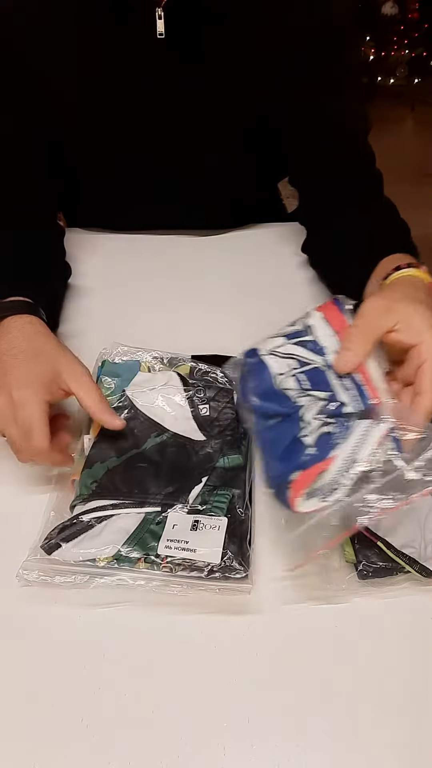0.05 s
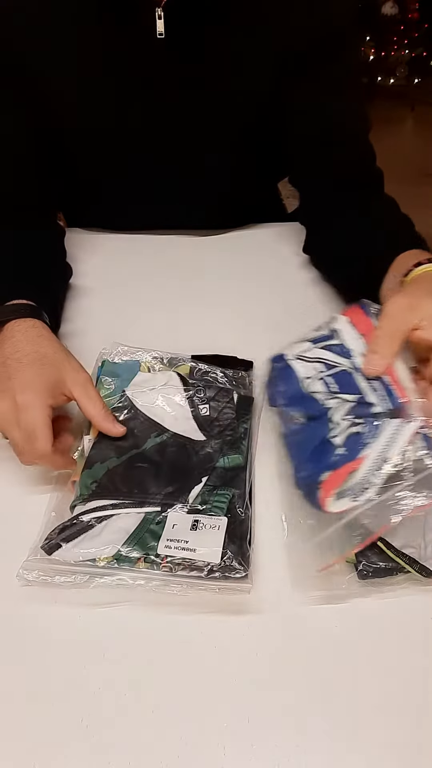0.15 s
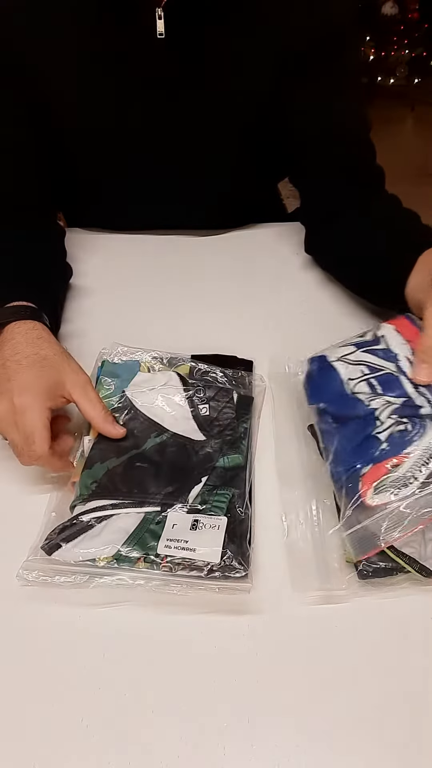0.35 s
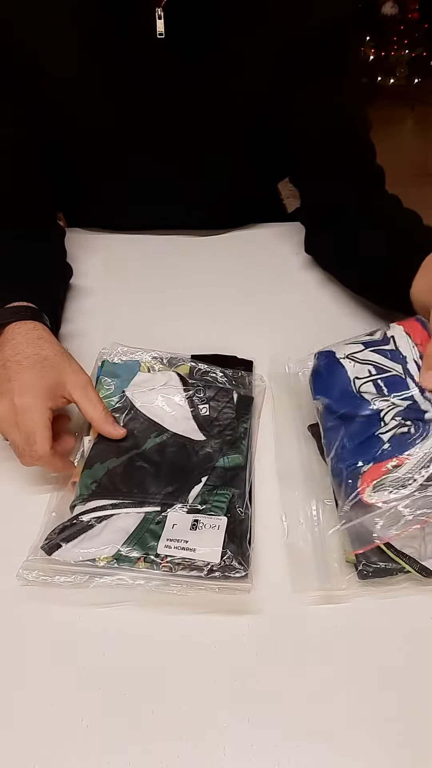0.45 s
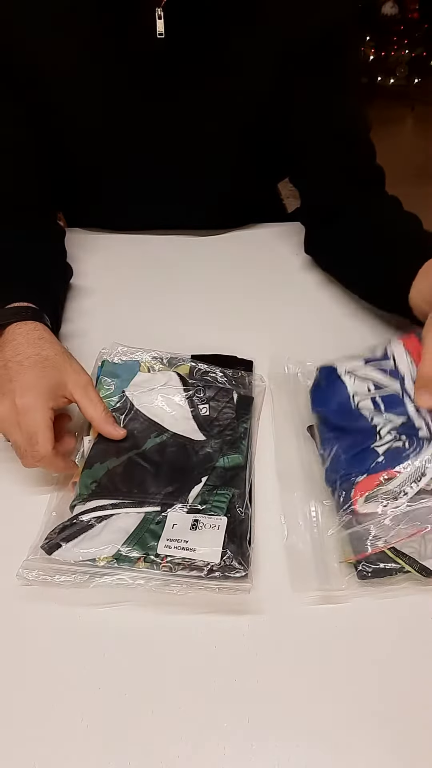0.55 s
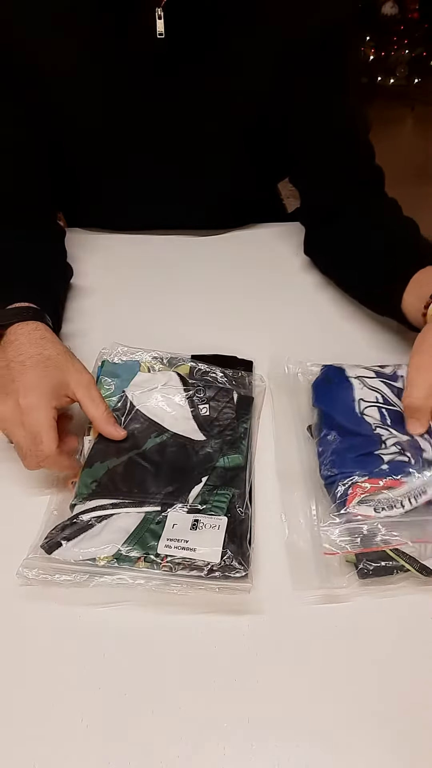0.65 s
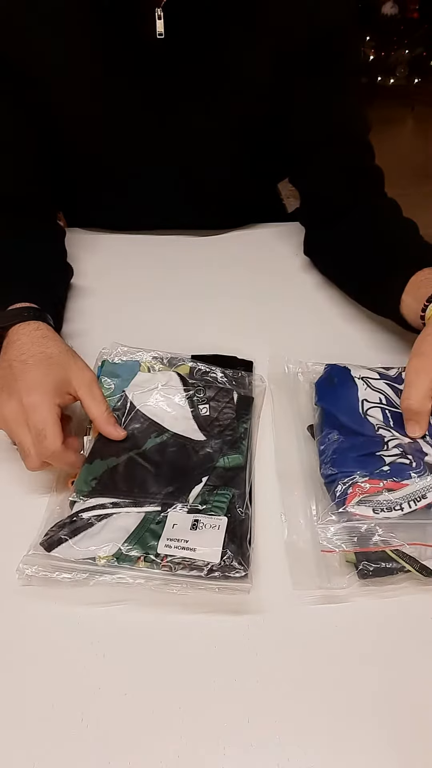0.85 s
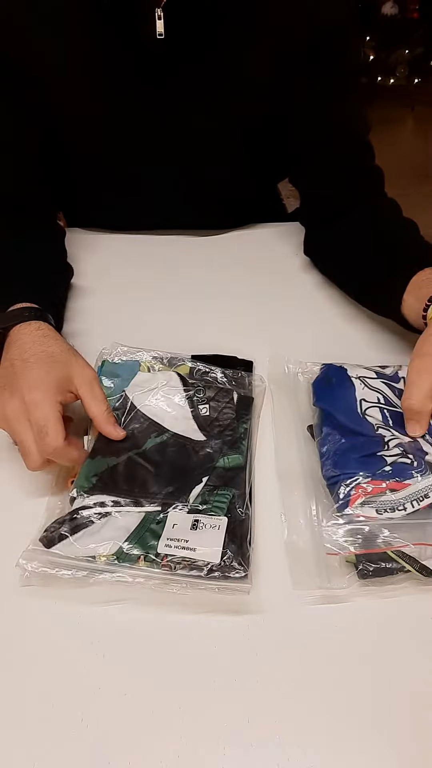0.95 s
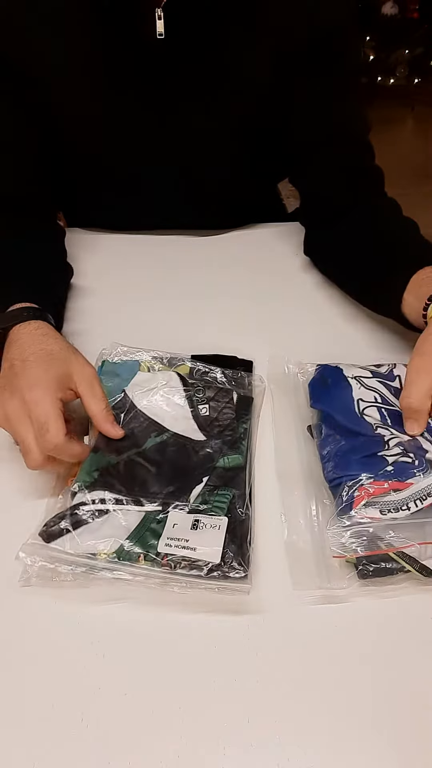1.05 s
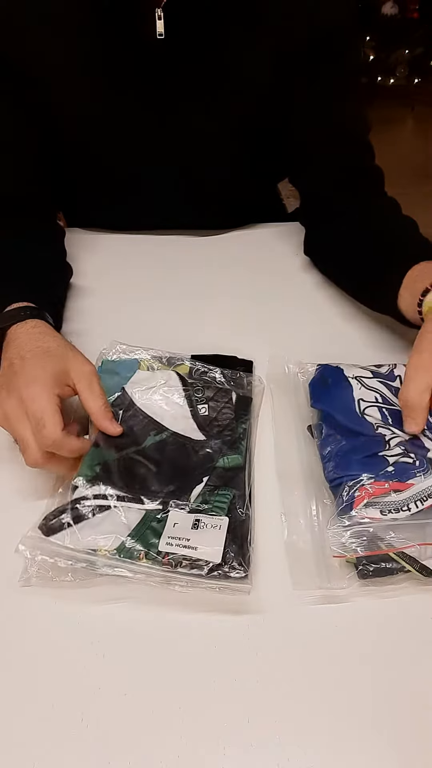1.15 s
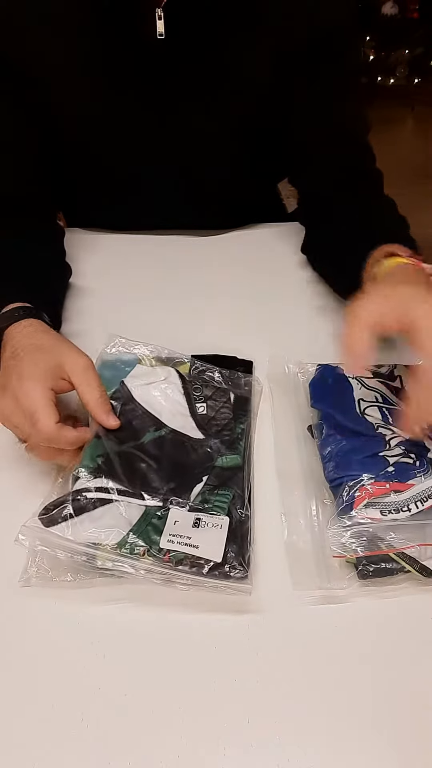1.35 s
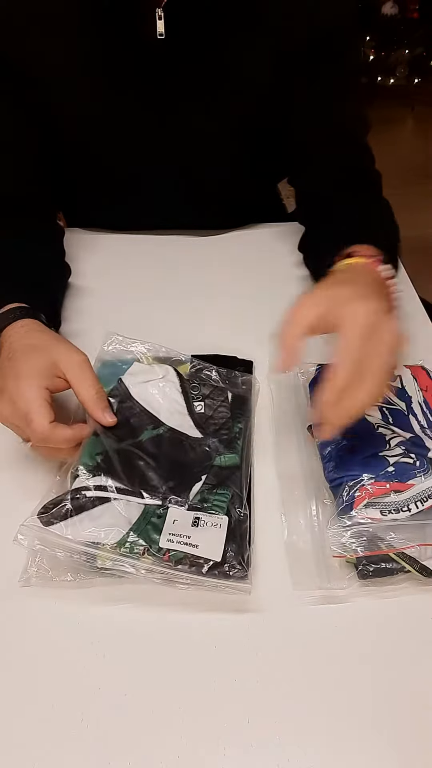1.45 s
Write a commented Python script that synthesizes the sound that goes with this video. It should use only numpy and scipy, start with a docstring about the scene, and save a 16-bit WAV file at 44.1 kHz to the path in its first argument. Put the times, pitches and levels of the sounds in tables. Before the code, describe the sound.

Thin plastic bags crinkle as one is set down on a table with a soft thud.

```python
"""A table in a quiet, fairly live room, where clothes packed in thin plastic bags are handled.
One bag is carried across, crinkling, and settles with a soft papery push and a thud; then fingers
nudge the bags. Creases buckle in single sharp snaps and brief crunches over a fine rustle.
The room answers each with a short hiss, over its own low hum."""
import sys
import numpy as np
from scipy import signal
from scipy.fft import rfft, irfft
from scipy.io import wavfile

SR = 44100
rng = np.random.default_rng(int(sys.argv[2]) if len(sys.argv) > 2 else 0)


def log_audio(samples):
    """Write samples as a 16-bit WAV file to the path given in sys.argv[1]."""
    # one column per channel
    frames = np.atleast_2d(samples).T
    # limit to full scale, then quantise
    limited = np.clip(frames, -1, 1)
    pcm = np.round(limited * 32767).astype(np.int16)
    wavfile.write(sys.argv[1], SR, pcm)


N = 66150
TIME = np.arange(N) / SR
FLUTTER_DECAY_S = 0.0016

# Film resonances. Each row: centre in Hz, relative level in dB.
TICK_MODES, TICK_WIDTH_HZ = [(6400, 1.5), (10700, -0.5), (13600, -7.5)], 3200
# Each row: start in seconds, flap level in dB, crease pitch in Hz, ring level in dB, tick level in dB.
# Levels are relative within a column.
CREASE_SNAPS = [ (0.031, -56, 1880, -68, -63.5), (0.0855, -54, 1850, -58.5, -79),
                (0.1061, -52, 1290, -54, -76), (0.1321, -51, 4060, -49, -55),
                (0.1789, -58, 5070, -52, -50.5), (0.2028, -57, 2070, -44, -72),
                (0.2078, -61, 1880, -45, -70), (0.216, -68, 2480, -39, -40),
                (0.2869, -97, 2300, -37.5, -56), (.3080, -63, 2320, -57, -60),
                (0.3675, -48, 3930, -41, -79), (0.3833, -46, 2400, -41, -42.5),
                (0.4319, -71, 4640, -47.5, -68), (0.4772, -54, 2300, -48.5, -68),
                (0.5463, -47.5, 5440, -44.5, -58), (0.6008, -40.5, 3300, -49, -61),
                (0.6102, -71, 3500, -42.5, -56), (0.6250, -44.5, 1530, -41, -51),
                (0.6568, -31.5, 4360, -38, -30), (0.7046, -36, 2470, -38.5, -64),
                (0.8360, -52.5, 1680, -46, -58), (0.8577, -76, 4000, -43.5, -68),
                (0.9141, -82, 3830, -57, -60.5), (.9682, -52.5, 5500, -52.5, -63),
                (.9928, -50, 1750, -54, -51), (1.0032, -52, 2270, -40, -35.5),
                (1.1047, -81, 2550, -53, -59), (1.1165, -49.5, 5100, -58, -47),
                (1.1450, -46, 5080, -44.5, -43), (1.2025, -62, 3200, -53, -47.5),
                (1.3273, -73, 3240, -59, -67), (1.3470, -63.5, 4000, -58.5, -50.5),
                (1.4565, -74, 2050, -58, -55.5), (1.4708, -62, 4560, -52.5, -55.5)]
def snaps(flap_decay_s=0.0015, flap_band_hz=(475, 1580), ring_width_hz=1460):
    """A buckling crease kicks and flutters: it rings, the film ticks, the sheet around it flaps."""
    out, size = np.zeros((2, N + SR)), SR // 20
    t = TIME[:size]
    gain = np.sqrt(100 / size)  # energy of 100 samples at unit level
    for start_s, flap_db, hz, ring_db, tick_db in CREASE_SNAPS:
        flutter = 0.12 * np.exp(-t / FLUTTER_DECAY_S) * rng.standard_normal(size)
        kick = signal.unit_impulse(size) + flutter
        flap = band(np.exp(-t / flap_decay_s) * rng.standard_normal(size), *flap_band_hz)
        radiated = np.array([facet_echo(kick), facet_echo(kick)])
        ring = band(resonance(radiated, hz, ring_width_hz), hz / 1.78, hz * 1.64)
        tick = sum(from_db(db) * resonance(radiated, f, TICK_WIDTH_HZ) for f, db in TICK_MODES)
        parts = [(flap, flap_db + 1), (ring, ring_db - 2), (tick, tick_db)]
        i = int(start_s * SR)
        out[:, i:i + size] += gain * sum(rms_one(part) * from_db(db) for part, db in parts)
    return out[:, :N]


def facet_echo(kick, longest_trip_s=0.0006, reflection=0.51):
    """The kick bounces between a film facet's edges: smeared in time, colour unchanged."""
    gap = int(rng.uniform(.15, 1) * longest_trip_s * SR)
    loop = np.r_[1, np.zeros(gap), -reflection]
    return signal.lfilter(loop[::-1], loop, kick)


# Each row: centre in seconds, Gaussian sigma in seconds, level at the centre in dB.
FOLD_CRUNCHES = [(0.5619, 0.0012, -36.5), (0.674, 0.014, -44), (0.998, 0.004, -47.5),
                 (1.1445, 0.0011, -42.5)]
def crunches(band_hz=(1700, 8150)):
    """A fold gives way in a quick, bright run of clicks."""
    swell = sum(from_db(db) * np.exp(-.5 * ((TIME - centre_s) / sigma_s) ** 2)
                for centre_s, sigma_s, db in FOLD_CRUNCHES)
    clicks = grains(per_s=12000, spread_db=2.5, scatter_db=9)
    return swell * rms_one(band(clicks, *band_hz))


# How hard the film is flexed. Each row: time in seconds, relative level in dB.
FILM_FLEXING = [(.026, -101), (.034, -64.5), (.115, -56.5), (.18, -57), (.25, -56.5), (.40, -60),
                (.52, -68), (.565, -51.5), (.64, -55), (.68, -49), (.79, -61), (.85, -57.5), (.94, -62.5),
                (1.0, -55.5), (1.18, -58.5), (1.29, -69), (1.5, -66)]
# Each row: frequency in Hz, relative spectral density in dB.
RUSTLE_SPECTRUM = [(150, 1), (300, -3.5), (600, 3.5), (1200, 2), (2400, -1), (4500, -6), (8000, -8),
                   (15000, -23.5)]
def rustle(creases_per_s=1300, shapes=8):
    """Countless small creases give way as the film flexes, each with a brief flutter."""
    t = TIME[:SR // 100]
    flutters = np.exp(-t / FLUTTER_DECAY_S) * rng.standard_normal((shapes, 1, len(t)))
    creases = np.zeros((2, N))
    for flutter in flutters:
        clicks = grains(creases_per_s / shapes, spread_db=4.5, scatter_db=8)
        creases += signal.fftconvolve(clicks, flutter, axes=1)[:, :N]
    return envelope(FILM_FLEXING) * from_db(-1.5) * rms_one(colour(creases, RUSTLE_SPECTRUM))


# The bag's weight on the table. Each row: time in seconds, relative level in dB.
BAG_PRESSING = [(.51, -82), (.55, -58.5), (.60, -50.5), (.665, -47), (.71, -53), (.77, -61), (.90, -91),
                (.99, -63.5), (1.07, -73), (1.14, -61), (1.26, -88)]
# Each row: frequency in Hz, relative spectral density in dB.
SLIDE_SPECTRUM = [(60, -32), (150, -2.5), (220, -8.5), (310, 2.5), (850, 3), (1600, -7.5), (3500, -13.5),
                  (10000, -26.5)]
def slide():
    """The filled bag slips over the table in dense, dull catches."""
    slips = grains(per_s=750, spread_db=2.5, scatter_db=4.5)
    return envelope(BAG_PRESSING) * from_db(3) * rms_one(colour(slips, SLIDE_SPECTRUM))


# Each row: frequency in Hz, level in dB, T60 in seconds.
LANDING_MODES = [(67, -60.5, 1.07), (96.3, -61.5, 2.7), (140.2, -55.5, 0.57), (248, -42, 0.051),
                 (320, -47, 0.3)]
def landing_thud(landing_s=0.656, contact_s=0.0038):
    """The soft landing gives a thud and a faint low ringing in the room."""
    t = np.maximum(TIME - landing_s, 0)
    ring = sum(from_db(db - 60 * t / t60) * np.sin(2 * np.pi * hz * t) for hz, db, t60 in LANDING_MODES)
    return (1 - np.exp(-t / contact_s)) * ring


# Each row: frequency in Hz, reverberant gain in dB.
REVERB_GAIN = [(100, -2), (400, -8), (1500, -1.5), (6300, -4), (10500, -4.5), (15000, -3)]
# Each row: frequency in Hz, T60 in seconds.
REVERB_T60 = [(200, 0.26), (2000, 0.49), (6000, 0.38), (14000, 0.27)]
# Each row: frequency in Hz, side over mid in dB.
REVERB_WIDTH = [(250, -6), (550, -6.5), (1100, 4.5)]
def reverb(x, delay_s=0.003, build_s=0.0026):
    """The room's diffuse tail lasts longest near 2 kHz and is wider in the treble."""
    t, response = np.maximum(TIME - delay_s, 0), 0
    edges_hz = np.geomspace(22, 18000, 21)
    for low, high in zip(edges_hz, edges_hz[1:]):
        hz = np.sqrt(low * high)
        decay = (1 - np.exp(-t / build_s)) * from_db(-60 * t / at_hz(REVERB_T60, hz))
        noise = band(stereo_noise(at_hz(REVERB_WIDTH, hz)), low, high)
        response += from_db(at_hz(REVERB_GAIN, hz)) * noise * rms_one(decay) / np.sqrt(N)
    return signal.fftconvolve(x, response, axes=1)[:, :N]


# Each row: frequency in Hz, relative spectral density in dB.
AIR_SPECTRUM = [(32, -23.5), (50, -4), (150, -6), (250, -12.5), (600, -27), (2000, -42), (15000, -38.5)]
def room_air(level_db=-68):
    """Steady low hum and faint hiss of the room."""
    return from_db(level_db) * rms_one(colour(stereo_noise(side_db=-12), AIR_SPECTRUM))


def grains(per_s, spread_db, scatter_db):
    """Random stereo clicks, many small and few large, each from its own direction."""
    born = rng.random(N) < per_s / SR
    sizes = from_db(spread_db * np.minimum(rng.exponential(1, N), 4))
    signs = rng.choice([-1, 1], N)
    pan = from_db(scatter_db * rng.standard_normal(N) * np.array([[1], [-1]]) / 2)
    return born * sizes * signs * pan


def stereo_noise(side_db):
    """White noise with a chosen width."""
    mid, side = rng.standard_normal((2, N))
    return rms_one(mid + from_db(side_db) * side * np.array([[1], [-1]]))


def colour(x, spectrum):
    """Minimum-phase filter that follows (Hz, dB) rows."""
    size = 2 * N
    hz = np.maximum(np.arange(N + 1) * SR / size, 1)
    cepstrum = irfft(np.log(from_db(at_hz(spectrum, hz))))
    cepstrum[1:N] *= 2
    cepstrum[N + 1:] = 0
    return irfft(rfft(x, size) * np.exp(rfft(cepstrum)))[..., :N]


def band(x, low_hz, high_hz, order=2):
    """Causal band-pass."""
    sos = signal.butter(order, [low_hz, high_hz], "band", fs=SR, output="sos")
    return signal.sosfilt(sos, x + 1e-18)


def resonance(x, hz, width_hz):
    """One damped mode."""
    return band(x, hz - width_hz / 2, hz + width_hz / 2, order=1)


def envelope(points):
    """Gain over time from (s, dB) rows."""
    return from_db(np.interp(TIME, *np.transpose(points)))


def at_hz(points, hz):
    """Read a table on a log-frequency axis."""
    knots_hz, values = np.transpose(points)
    return np.interp(np.log(hz), np.log(knots_hz), values)


def from_db(db):
    """Decibels to gain."""
    return 10 ** (np.asarray(db) / 20)


def rms_one(x):
    """Scale to unit RMS."""
    return x / np.sqrt(np.mean(x ** 2) + 1e-20)


# Balance of the direct sound. Each row: frequency in Hz, left over right in dB.
DIRECT_BALANCE = [(900, 0), (2200, 8), (4200, 1), (8000, -7.5), (12000, 6)]
def scene():
    """Bags and the landing thud in the room, over its low hum."""
    bags = snaps() + crunches() + rustle() + slide()
    direct = np.array([colour(channel, [(hz, side * db / 2) for hz, db in DIRECT_BALANCE])
                       for channel, side in zip(bags, (1, -1))])
    return direct + landing_thud() + room_air() + reverb(bags)


def record(dry):
    """Steep low-pass at 15.9 kHz."""
    return signal.sosfilt(signal.ellip(10, .2, 70, 15900, fs=SR, output="sos"), dry)


dry = scene()
out = record(dry)
log_audio(out)
```